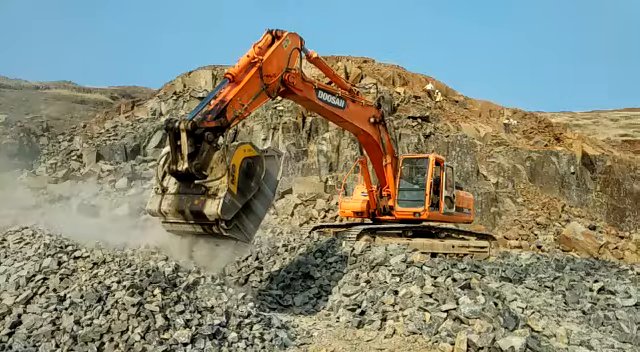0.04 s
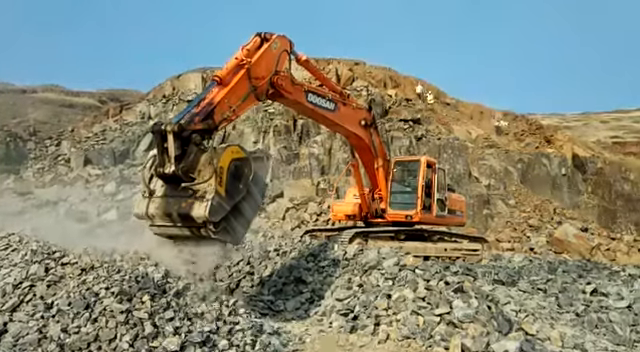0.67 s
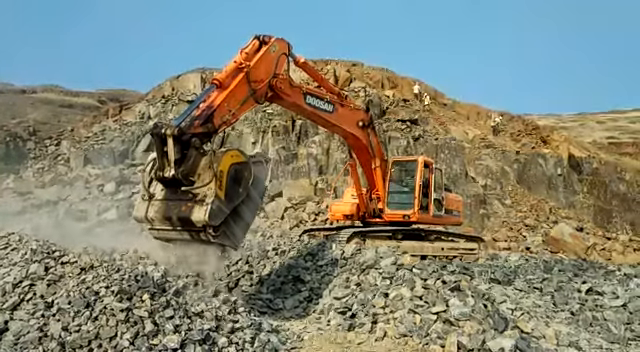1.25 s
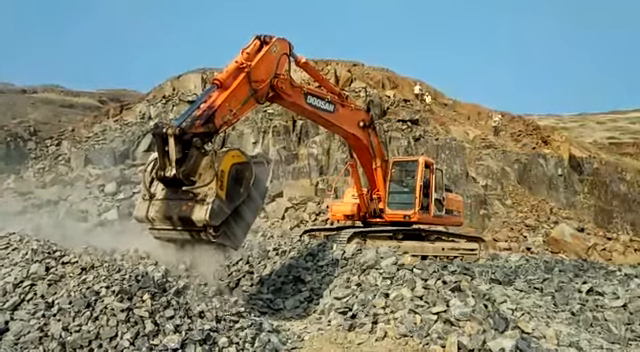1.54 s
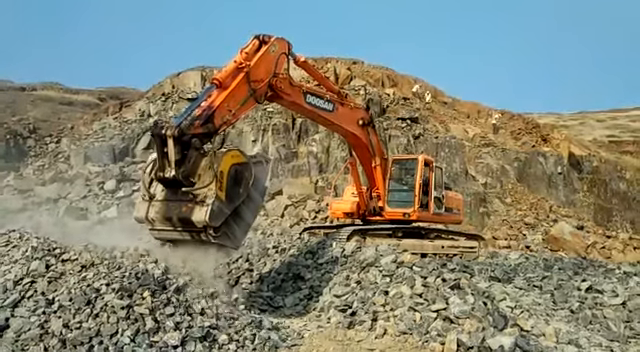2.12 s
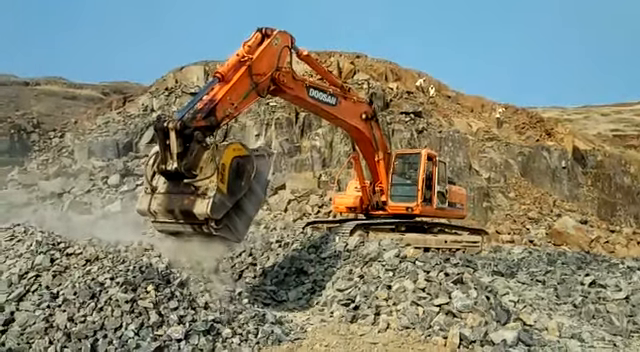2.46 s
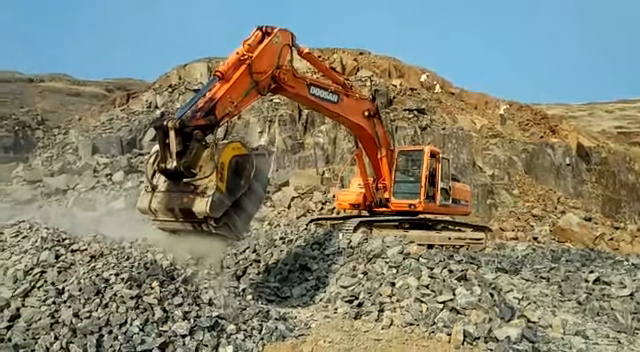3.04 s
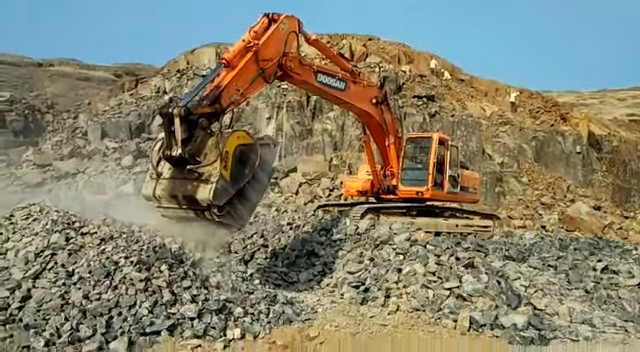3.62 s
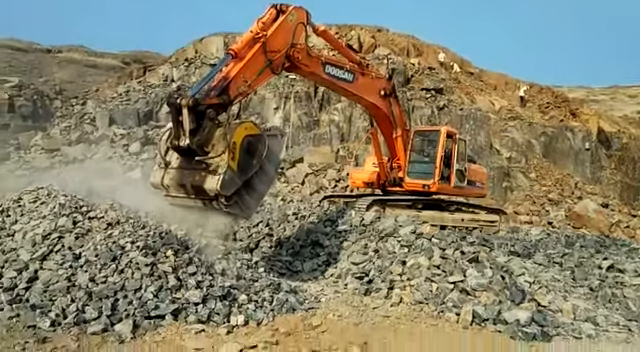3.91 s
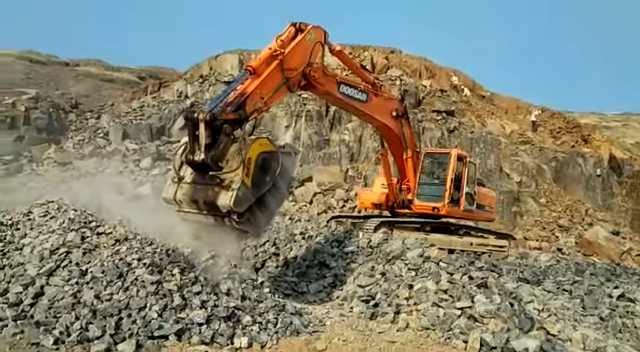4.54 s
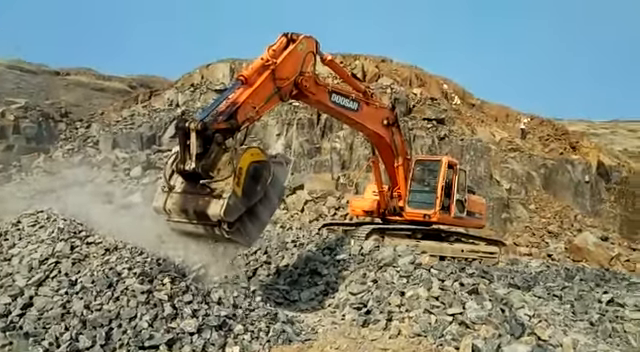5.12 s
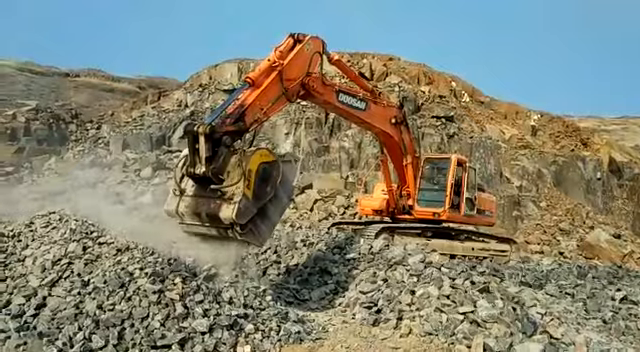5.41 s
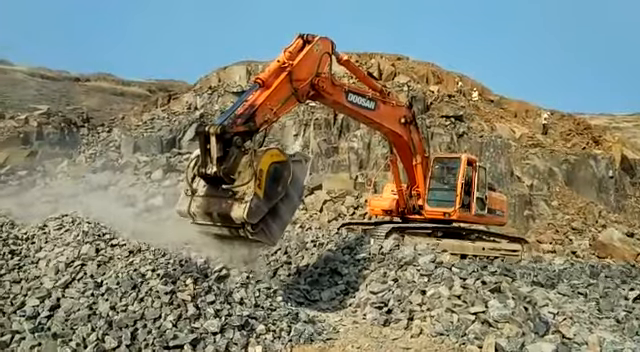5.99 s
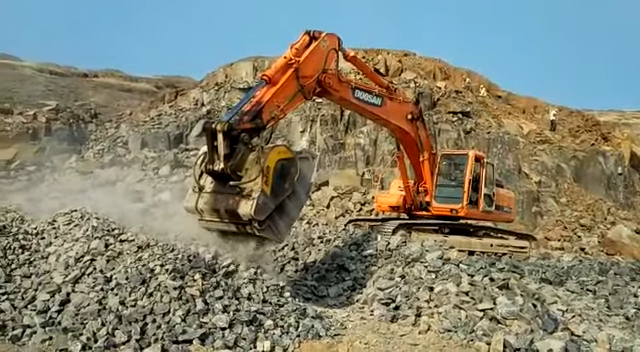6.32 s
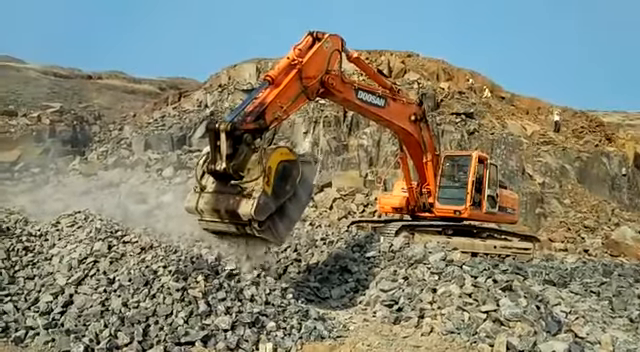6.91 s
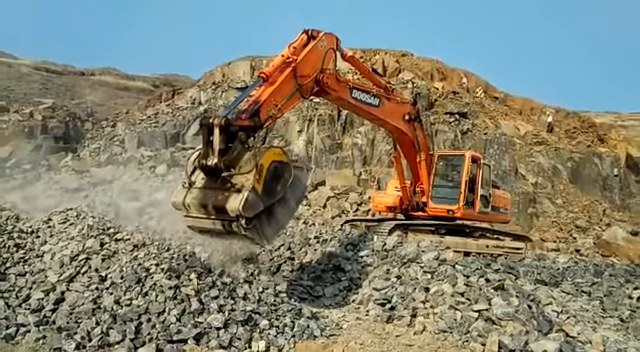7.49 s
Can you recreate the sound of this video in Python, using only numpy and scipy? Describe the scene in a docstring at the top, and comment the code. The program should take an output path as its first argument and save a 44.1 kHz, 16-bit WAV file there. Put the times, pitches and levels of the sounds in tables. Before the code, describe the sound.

Rapid, rhythmic crunching of rock in a steel crusher bucket, with a rumbling diesel engine, hissing grit and clinking chips in a quarry.

```python
"""A quarry, hand-held microphone, an excavator's crusher bucket straight ahead. After 0.7 s of silence
the diesel rumbles, rubble churns and gravel pours. From 0.8 s the jaw closes almost six times a second,
each bite a burst of fractures that booms in the steel and sprays grit. Chips clink on the heap, stones
knock in the bucket, then heavy rocks boom. Between 4 and 4.5 s the microphone turns and the treble
dulls; the jaw chews on and bites hardest at the end."""
import sys
import numpy as np
from scipy import signal
from scipy.fft import rfft, irfft
from scipy.io import wavfile
from scipy.ndimage import map_coordinates

SR = 44100
rng = np.random.default_rng(int(sys.argv[2]) if len(sys.argv) > 2 else 0)


def write(x):
    x = np.atleast_2d(x).T
    wavfile.write(sys.argv[1], SR, np.round(np.clip(x, -1, 1) * 32767).astype(np.int16))


N = 341775
TIME = np.arange(N) / SR
FFT_SIZE = 16384
FREQ = np.fft.rfftfreq(FFT_SIZE, 1 / SR)
MIC_OPENS_S, MIC_TOP_HZ = 0.737, 14330
USUAL_BITE_DB = -20

# the diesel's rumble as its load changes: t/s, relative level/dB
ENGINE_LEVEL = [(0.9, -45), (1.22, -43), (1.56, -34.5), (3.06, -42), (3.42, -42.5), (4.01, -38.5),
                (4.23, -46), (5.27, -48), (5.73, -42), (6.39, -41.5), (6.96, -41.5), (7.7, -47)]
# spectra of the diesel, the loose rubble and the breaking stone: f/Hz, relative level/dB
ENGINE_SPECTRUM = [(20, -23), (38, -17), (58, -2), (80, -1.5), (100, 4.5), (130, 1), (200, -6.5),
                   (330, -23), (600, -32)]
RUBBLE_SPECTRUM = [(120, -24.5), (260, -1), (500, 0.5), (780, 0.5), (1100, 1), (1500, -3), (2200, -8.5),
                   (3200, -21), (5000, -38)]
STONE_SPECTRUM = [(40, -21), (80, -11), (130, -0.5), (300, 0), (750, -2), (1050, -1.5), (1600, -9),
                  (3000, -18)]
# resonances and hollows of the steel bucket: f/Hz, width/Hz, gain/dB
BUCKET_MODES = [(64.4, 3.8, -2), (134, 14, 0), (192, 6.4, 3), (219, 13, -3), (298, 25, 4), (379, 6.3, -18),
                (443, 26, 3), (515, 17.6, -10), (609, 26.6, 6), (654, 22, -1.5), (760, 50, 5),
                (890, 20, 5.5), (1140, 49, -1.5), (1326, 13, 2), (1825, 29, -3.5), (2123, 49, 3.5)]
# flow of gravel out of the bucket: t/s, relative level/dB
GRAVEL_FLOW = [(0.9, -28.5), (0.97, -31.5), (2.28, -31), (2.81, -39.5), (3.17, -32.5), (5.14, -42),
               (5.71, -35.5), (6.58, -40), (7.7, -31)]
# bites of the jaw: t/s at full force, strength/dB, rise/s, hold/s
BITES = [(0.831, -23.5, 0.062, 0.021), (1.014, -23.5, 0.034, 0.032), (1.202, -19.5, 0.072, 0.0064),
         (1.362, -17.5, 0.064, 0.028), (1.532, -17.5, 0.075, 0.027), (1.694, -16.5, 0.058, 0.025),
         (1.88, -19, 0.093, 0.025), (2.054, -19, 0.087, 0.015), (2.188, -24.5, 0.072, 0.056),
         (2.4, -25.5, 0.15, 0.013), (2.554, -18.0, 0.045, 0.034), (2.742, -21.5, 0.1, 0.0087),
         (2.907, -18.5, 0.044, 0.033), (3.076, -18.0, 0.043, 0.05), (3.275, -17.0, 0.059, 0.019),
         (3.43, -23.5, 0.05, 0.025), (3.601, -21, 0.055, 0.02), (3.759, -22.5, 0.045, 0.037),
         (3.956, -22.5, 0.081, 0.012), (4.1, -19.5, 0.044, 0.055), (4.293, -17.5, 0.056, 0.025),
         (4.473, -22.0, 0.05, 0.028), (4.642, -21.5, 0.029, 0.012), (4.804, -18, 0.032, 0.017),
         (4.969, -25, 0.086, 0.021), (5.153, -29, 0.102, 0.02), (5.323, -19.5, 0.062, 0.022),
         (5.501, -26.5, 0.1, 0.013), (5.656, -20, 0.059, 0.034), (5.843, -18.5, 0.057, 0.028),
         (6.034, -19.5, 0.095, 0.005), (6.172, -24, 0.1, 0.047), (6.338, -16, 0.056, 0.042),
         (6.503, -18.5, 0.048, 0.028), (6.682, -21.5, 0.05, 0.046), (6.857, -22, 0.057, 0.03),
         (7.029, -25.0, 0.074, 0.022), (7.211, -20.0, 0.066, 0.031), (7.36, -14.5, 0.054, 0.032),
         (7.541, -15, 0.053, 0.045), (7.744, -15.5, 0.062, 0.047)]
# bass and treble in the bites: t/s, bass gain/dB, treble gain/dB
BITE_COLOUR = [(0.85, -5, 2), (1.2, -18, 0), (1.4, -5, -2.5), (2.05, -3, 0.0), (2.23, -12, -3),
               (2.57, -1.5, -2), (3.1, -6.5, 1.5), (3.45, -13, -0.5), (3.95, -9, -3.0), (4.12, -1.5, -2),
               (4.5, -8.5, -3), (5.65, -4.5, -2.5), (6.15, 1.5, -4.0), (6.7, -2, -3.0), (7.05, -7.5, -1),
               (7.7, -5, -4.0)]
# loudest chips on the heap, stones in the bucket and heavy rocks: t/s, relative peak level/dB, f/Hz
CHIPS = [(0.932, -21.5, 7250), (1.094, -23, 4380), (1.129, -25, 7940), (1.475, -23, 11600),
         (2.176, -21, 5592), (2.189, -18, 5930), (2.222, -20, 5920), (2.258, -10.5, 10500),
         (2.469, -20, 9450), (3.868, -21.5, 10500), (6.665, -17, 9200)]
KNOCKS = [(1.005, -6.5, 1765), (2.226, -6, 1340), (2.735, -8, 1396), (2.822, -16.5, 2210),
          (3.608, -6.5, 765), (3.738, -14, 730), (4.081, -9, 711), (4.245, -16, 633), (4.303, -6, 636),
          (4.637, -12, 795), (5.664, -6, 725), (6.637, -15, 776), (6.845, -10.5, 742), (7.583, -7, 736)]
BOOMS = [(1.69, -19, 136), (2.57, -19, 294), (2.905, -17, 150.5), (4.295, -15, 301), (4.818, -14.5, 321),
         (5.62, -17.5, 153.5), (5.975, -13, 148), (6.303, -14.5, 149), (6.482, -19, 288), (7.195, -13, 434),
         (7.728, -13, 444)]
# where the microphone points: t/s, aim (0 before the turn, 1 turning, 2 or more after)
MIC_AIM = [(3.98, 0.15), (4.15, 0.59), (4.34, 1.3), (4.5, 2.13)]
# treble at the microphone before, during and after the turn: f/Hz, relative level/dB
TREBLE_BEFORE = [(1100, 4), (1400, 7), (1850, 3.5), (2100, 2), (2700, -5), (3050, -13.5), (3600, -20),
                 (5300, -10.5), (6600, -11.5), (7800, -16), (8800, -10.5), (10400, -11.5), (11500, -18.5),
                 (14200, -27)]
TREBLE_TURNING = [(1400, 7), (1900, -3), (2650, -23), (3100, -15.5), (3600, -13), (4200, -14.5),
                  (5000, -24), (5900, -29), (6900, -7), (8100, -12), (8900, -9), (10300, -13), (11500, -22),
                  (14200, -23)]
TREBLE_AFTER = [(1100, -8.5), (1400, -1.5), (1700, -3.5), (2000, -10.5), (3000, -15.5), (3700, -22.5),
                (4400, -20), (5000, -23.5), (6100, -21.5), (6800, -13), (9000, -14), (10500, -16.5),
                (12000, -23.5), (14200, -27)]
# stereo width at the microphone: f/Hz, side gain/dB
STEREO_WIDTH = [(3900, -70), (4200, -42), (5100, -22), (6700, -11), (7800, -4), (10500, -5.5), (14000, -6)]


def amp(db):
    """Decibels to gain."""
    return 10 ** (np.asarray(db) / 20)


def unit(x):
    """Scaled to rms 1."""
    return x / np.sqrt(np.mean(x ** 2) + 1e-20)


def curves(rows):
    """One value per sample for each column after the time."""
    times, *columns = np.transpose(rows)
    return [np.interp(TIME, times, column) for column in columns]


def wobble(per_second):
    """A smooth random curve with this many knots a second."""
    knots = rng.standard_normal(int(N * per_second / SR) + 4)
    return map_coordinates(knots, [TIME * per_second], order=2)


def shape(points):
    """Gain per frequency from points (f/Hz, level/dB) on a log axis."""
    hz, db = np.transpose(points)
    return amp(np.interp(np.log(FREQ + 1), np.log(hz), db))


def below(hz, order=8):
    """Low-pass gain."""
    return np.exp(-np.logaddexp(0, 2 * order * np.log((FREQ + 1) / hz)).clip(0, 60) / 2)


def above(hz, order=8):
    """The matching high-pass gain."""
    return np.sqrt(1 - below(hz, order) ** 2)


def ring(x, gain):
    """x through a minimum-phase filter of this gain that keeps the power of white noise."""
    cepstrum = irfft(np.log(np.maximum(unit(gain), 1e-6)))
    cepstrum[1:FFT_SIZE // 2] *= 2
    cepstrum[FFT_SIZE // 2 + 1:] = 0
    response = irfft(np.exp(rfft(cepstrum)))
    return signal.oaconvolve(x, np.array(response, ndmin=x.ndim), axes=-1)[..., :N]


def filtered(x, gain):
    """x times a gain per frequency, without delay."""
    response = np.array(np.fft.fftshift(irfft(gain)), ndmin=x.ndim)
    return signal.oaconvolve(x, response, axes=-1)[..., FFT_SIZE // 2:FFT_SIZE // 2 + N]


def bucket():
    """Gain of the steel bucket's resonances and hollows."""
    return amp(sum(db * np.exp(-.5 * ((FREQ - hz) / width) ** 2) for hz, width, db in BUCKET_MODES))


def engine(firing_hz=65, drift=0.026):
    """The diesel rumbles unevenly around its firing note, which wanders slightly under the load."""
    level_db, = curves(ENGINE_LEVEL)
    load = amp(level_db + 3.5 + 2.2 * wobble(12))
    rumble = ring(rng.standard_normal(N), shape(ENGINE_SPECTRUM) * bucket())
    note_hz = firing_hz * (1 + drift * wobble(3.4))
    hum = np.sqrt(2) * np.sin(2 * np.pi * np.cumsum(note_hz) / SR)
    return load * (rumble + amp(-9.5) * hum)


def fractures(per_second, channels=1):
    """Stone cracks in tiny impulses at random moments and of random size, rms 1."""
    struck = rng.random((channels, N)) < per_second / SR
    return unit(struck * rng.standard_normal((channels, N)))


def patchy(x, depth_db, per_second, per_octave):
    """Every stone breaks with its own colour: smooth random patches of gain in time and pitch."""
    hz, t, spectrum = signal.stft(x, SR, nperseg=512)
    octaves = np.log2(1 + hz / 700)
    grid = np.array(np.meshgrid(octaves * per_octave, t * per_second, indexing="ij"))
    patches = map_coordinates(rng.standard_normal((128, 512)), grid, order=2, mode="mirror")
    return signal.istft(spectrum * unit(amp(depth_db * patches)), SR, nperseg=512)[1][..., :N]


def rubble(follows=0.91, lag_s=0.088, emptying_db_per_s=0.97):
    """Loose stone churns in the bucket, more after hard bites, and thins as the bucket empties."""
    bite_s, bite_db, *_ = np.transpose(BITES)
    shaken_db = np.interp(TIME - lag_s, bite_s, bite_db) - USUAL_BITE_DB
    level_db = -32 + follows * shaken_db - emptying_db_per_s * (TIME - TIME.mean())
    shifting = fractures(4000)[0] * amp(level_db + 1.9 * wobble(45))
    churn = ring(shifting, shape(RUBBLE_SPECTRUM) * bucket())
    return patchy(churn, depth_db=4.0, per_second=25, per_octave=9.68)


def aimed(x, band):
    """A bright sound in this band, its colour crossfading with the microphone's aim."""
    aim, = curves(MIC_AIM)
    colours = [TREBLE_BEFORE, TREBLE_TURNING, TREBLE_AFTER]
    audible = band * below(MIC_TOP_HZ + 400, order=60)
    return sum(np.maximum(1 - abs(aim - k), 0) * ring(x, shape(colour) * audible)
               for k, colour in enumerate(colours))


def gravel():
    """Crushed stone pours out of the bucket in a fine hiss (mid and side)."""
    flow_db, = curves(GRAVEL_FLOW)
    falling = fractures(7000, channels=2) * amp(flow_db - 4.0 + 2.5 * wobble(80))
    hiss = aimed(falling, above(6800, order=2) * above(1770))
    return patchy(hiss, depth_db=6.0, per_second=50, per_octave=14)


def stones(rows, t60, attack_s, modes_db, crack_db, crack_t60):
    """Each struck stone rings in its main mode and five inharmonic ones, with a burst of crackle."""
    out = np.zeros(N + SR)
    t = np.arange(int(SR * max(t60, crack_t60))) / SR
    onset = 1 - np.exp(-t / attack_s)
    usual_hz = np.median([hz for _, _, hz in rows])
    for s, db, hz in rows:
        age = t * np.sqrt(hz / usual_hz)  # smaller stones ring higher and die sooner
        modes_hz = np.minimum(hz * np.r_[1, np.exp(rng.normal(0, .22, size=5))], SR / 2)
        gains = np.r_[1, amp(modes_db + rng.normal(0, 3, size=5))]
        tone = gains @ np.sin(2 * np.pi * (modes_hz[:, None] * t + rng.random((6, 1))))
        band = signal.butter(2, [hz / 2, min(hz * 2, MIC_TOP_HZ)], "bandpass", fs=SR)
        crackle = unit(signal.lfilter(*band, rng.standard_normal(len(t))))
        hit = onset * (tone * amp(-60 * age / t60) + crackle * amp(crack_db - 60 * age / crack_t60))
        out[int(s * SR):][:len(t)] += amp(db) * hit / np.abs(hit).max()
    return out[:N]


def pebbles(count=110):
    """Small pebbles tick on the heap at random, louder when more gravel pours."""
    when, force, pitch = rng.random((count, 3)).T
    s = MIC_OPENS_S + when * (N / SR - MIC_OPENS_S)
    db = np.interp(s, *np.transpose(GRAVEL_FLOW)) + 3 + 7 * force ** 3
    hz = 6000 + 6000 * pitch
    return stones(np.c_[s, db, hz], t60=.03, attack_s=.001, modes_db=-6, crack_db=0, crack_t60=.03)


def jaw(level_db, follows, rise_scale, lag_s, release_db_per_s=259):
    """The jaw's force on one layer: it builds as stone is gripped, holds while it breaks, lets go."""
    power = np.zeros(N)
    for s, db, rise_s, hold_s in BITES:
        near = slice(max(int(s * SR) - SR // 5, 0), int(s * SR) + SR // 4)
        t = TIME[near] - s - lag_s
        peak_db = level_db + follows * (db - USUAL_BITE_DB)
        grip_db = 20 * np.minimum(t, 0) / (rise_s * rise_scale)
        release_db = release_db_per_s * np.maximum(t - hold_s, 0)
        power[near] += amp(peak_db + grip_db - release_db) ** 2
    return np.sqrt(power)


def crushing():
    """Clumps of fractures shake the bucket (mono) and throw off hissing grit (mid and side)."""
    bass_db, treble_db = curves(BITE_COLOUR)
    aim, = curves(MIC_AIM)
    off_axis = amp(-3.0 * np.maximum(aim - 1, 0))  # drops as the microphone finishes its turn
    clumps = unit(amp(1.15 * wobble(120)))
    thud = fractures(3000) * amp(bass_db)
    thud *= jaw(level_db=-19.5, follows=0.55, rise_scale=0.98, lag_s=-0.0025)
    crunch = fractures(9000) * clumps
    crunch *= jaw(level_db=-20.0, follows=1.04, rise_scale=1.0, lag_s=0.00021)
    crack = fractures(14000) * clumps * off_axis
    crack *= jaw(level_db=-20.0, follows=1.06, rise_scale=1.0, lag_s=0.00024)
    scrape = fractures(14000, channels=2) * clumps * off_axis
    scrape *= jaw(level_db=-27.5, follows=1.18, rise_scale=0.74, lag_s=0.0014)
    grit = fractures(14000, channels=2) * clumps * amp(treble_db)
    grit *= jaw(level_db=-23.5, follows=0.58, rise_scale=0.86, lag_s=0.00062)
    # the bucket's steel colours the low part; the bright spray reaches the microphone directly
    steel = bucket()
    body = shape(STONE_SPECTRUM) * steel
    bite = ring(thud, body * below(345, order=5))
    bite += ring(crunch, body * above(338, order=5) * below(1145))
    bite += aimed(crack, steel * above(1120) * below(2820))
    spray = aimed(scrape, above(2836) * below(6160)) + aimed(grit, above(6100))
    return (patchy(bite[0], depth_db=3.5, per_second=24, per_octave=11.99),
            patchy(spray, depth_db=3.0, per_second=30, per_octave=18))


def chips():
    """Chips land on the heap with a short, high clink."""
    return stones(CHIPS, t60=0.052, attack_s=0.0004, modes_db=-10.5, crack_db=-9, crack_t60=0.015)


def knocks():
    """Stones knock inside the bucket and ring in the midrange."""
    return stones(KNOCKS, t60=0.089, attack_s=0.0016, modes_db=-11, crack_db=-12, crack_t60=0.068)


def booms():
    """The heaviest rocks strike the bucket and make it boom."""
    return stones(BOOMS, t60=0.14, attack_s=0.0032, modes_db=-16, crack_db=-18, crack_t60=0.052)


def scene():
    """The machine stands straight ahead; only the treble spreads out, now wider, now narrower."""
    bite, (spray_mid, spray_side) = crushing()
    gravel_mid, gravel_side = gravel()
    impacts = amp(2.5) * chips() + amp(-3.5) * knocks() + amp(-1.5) * booms()
    mid = engine() + rubble() + gravel_mid + pebbles() + bite + spray_mid + impacts
    scattered = amp(-1.5) * spray_side + amp(0.8) * gravel_side + pebbles()
    side = filtered(scattered * amp(1.7 * wobble(12)), shape(STEREO_WIDTH))
    return np.array([mid + side, mid - side])


def record(dry, ceiling=0.85):
    """The microphone opens after a moment, rounds off peaks and keeps nothing above its band limit."""
    opened = dry * (TIME > MIC_OPENS_S)
    rounded = opened / (1 + np.abs(opened / ceiling) ** 6) ** (1 / 6)
    return filtered(rounded, below(MIC_TOP_HZ, order=350))


dry = scene()
out = record(dry)
write(out)
```